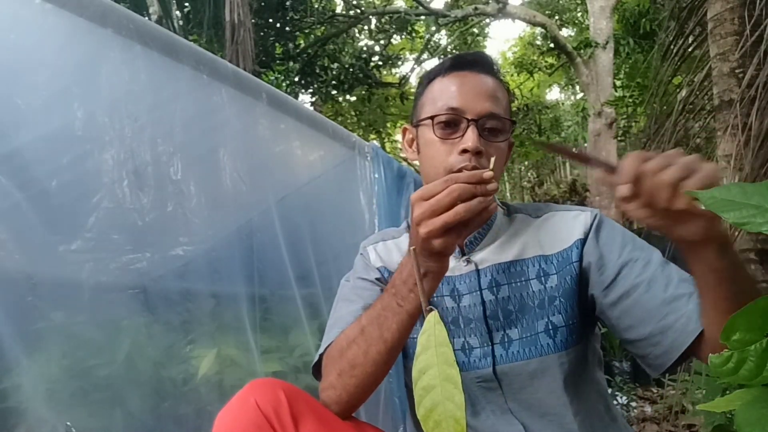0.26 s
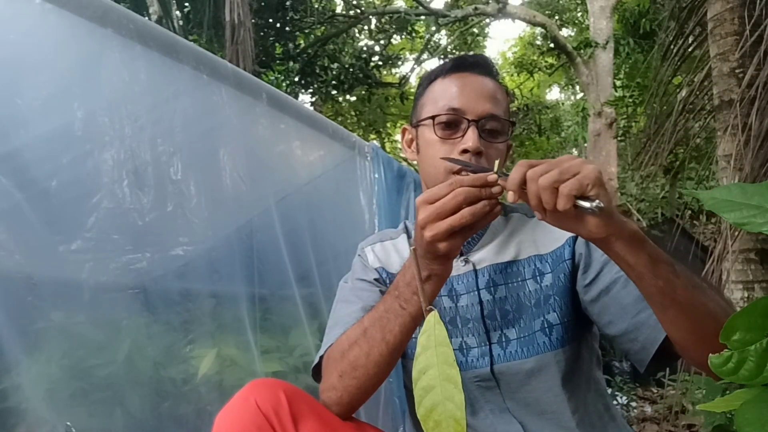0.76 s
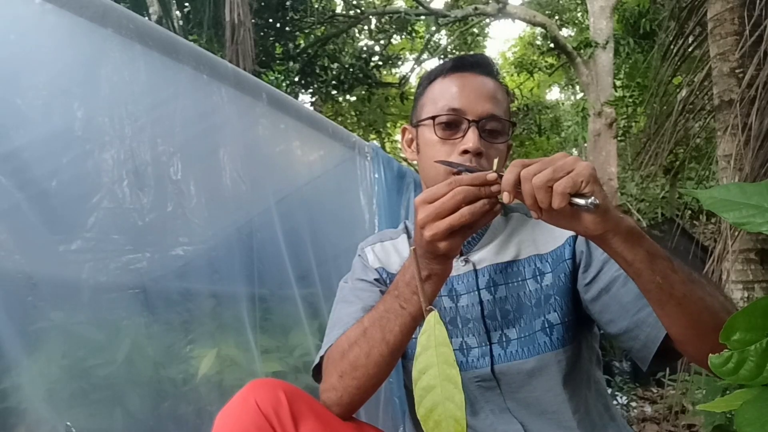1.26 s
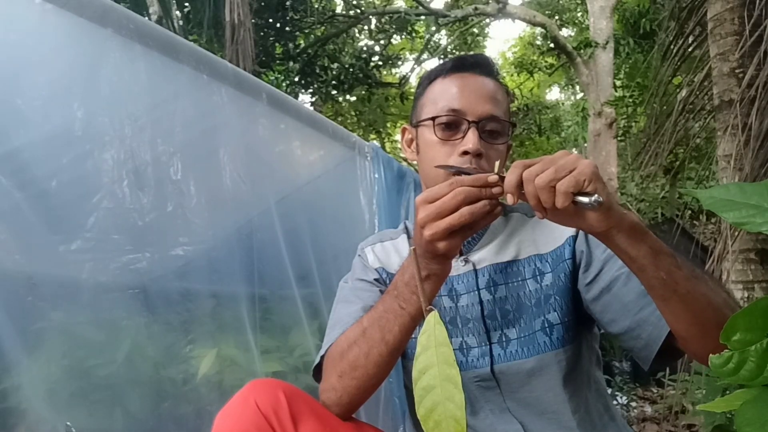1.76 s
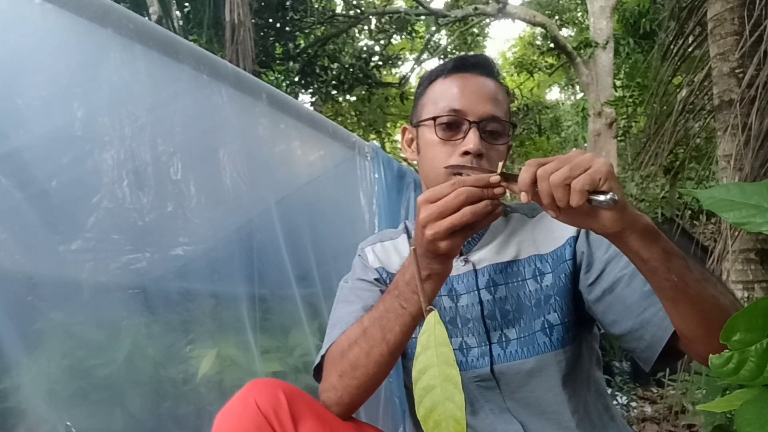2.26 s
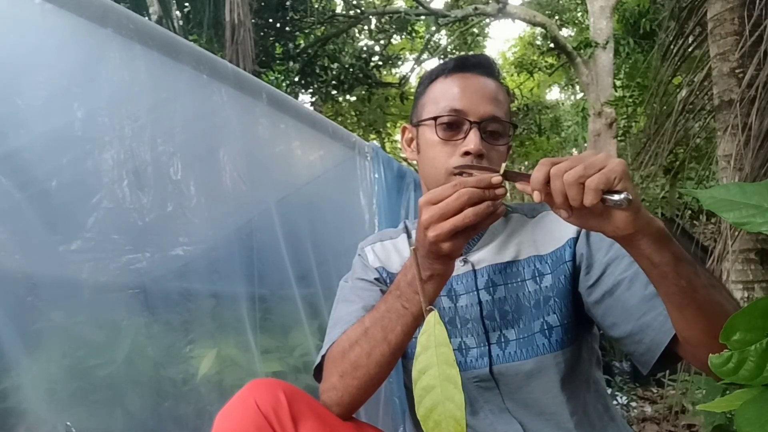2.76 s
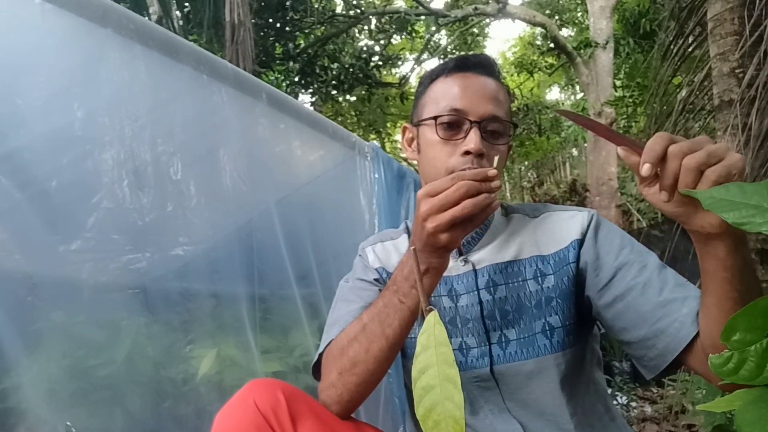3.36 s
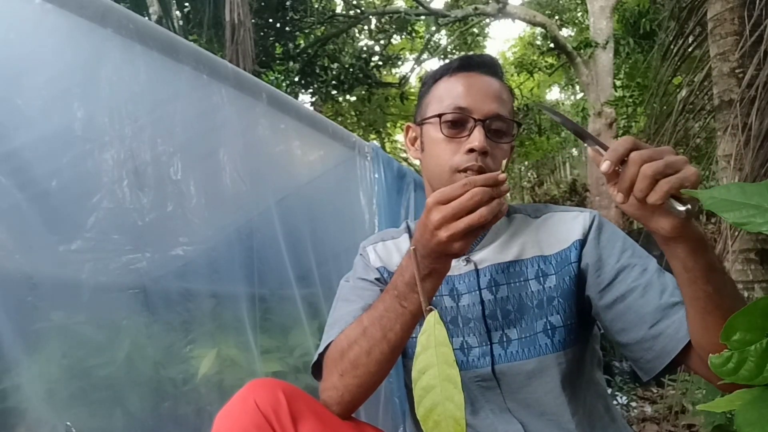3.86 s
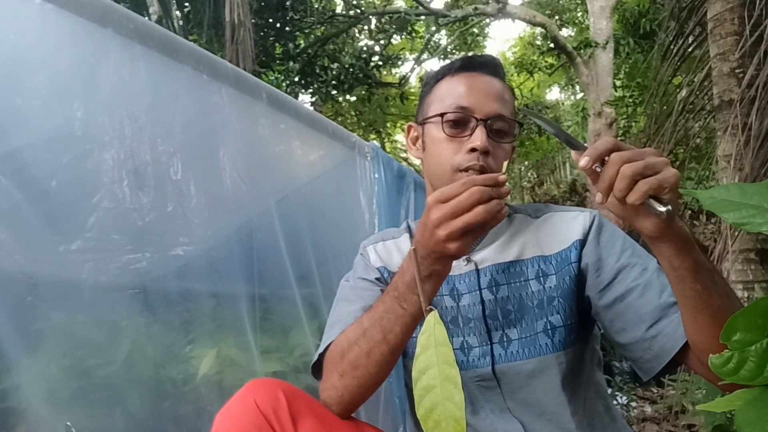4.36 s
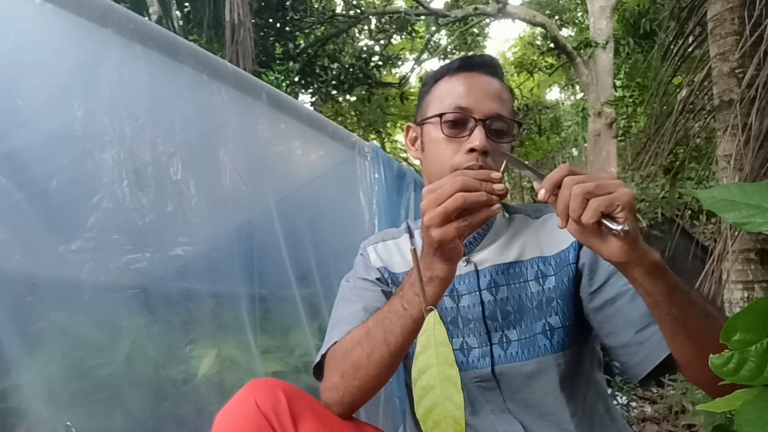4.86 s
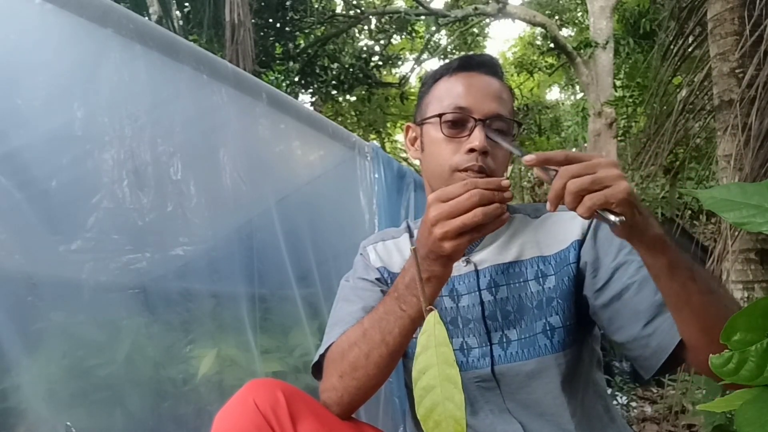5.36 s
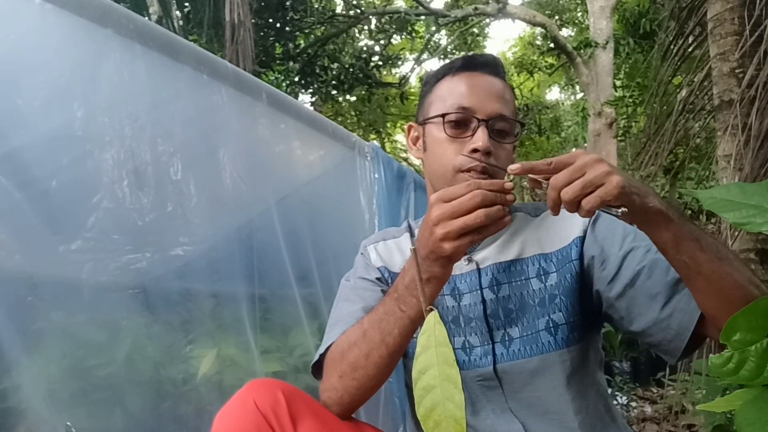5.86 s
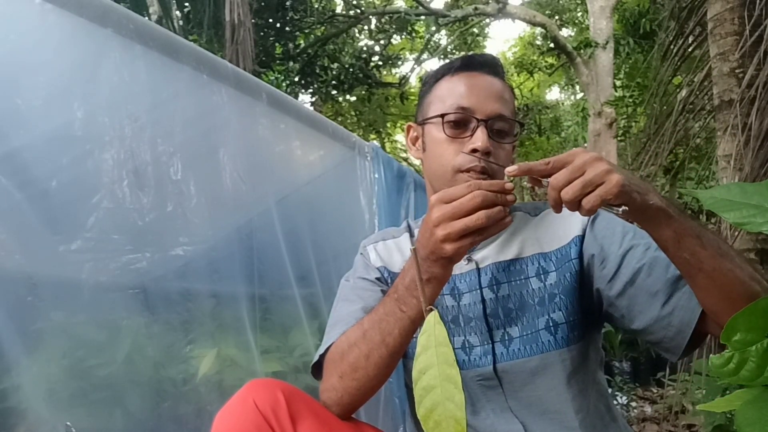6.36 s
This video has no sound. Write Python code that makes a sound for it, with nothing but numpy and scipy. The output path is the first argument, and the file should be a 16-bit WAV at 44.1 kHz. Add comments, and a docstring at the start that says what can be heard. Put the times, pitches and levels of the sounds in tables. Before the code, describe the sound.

Outdoors among trees, heard by a phone microphone. At 0 s a loud, clipped chick call falls away; a hollow woody knock lands at 0.2 s, with a far weaker, thinner tap at 0.34 s. A distant bird coos in low two-step whistles from 0.4 s, quick then slowing, and again from 5.7 s. Near chicks peep around 0.9, 1.6, 2.5 (drawn-out), 2.9, 4.0, 5.3, 5.7 and 6.4 s: soft held notes near 5 kHz plunging to about 2.3 kHz, with trunk echoes. A harsh chirp overlaps the 0.9 s peep. Crickets drone throughout near 4.5 kHz; a higher insect pulses in bursts, notably 2.5-3.1 and 5.5-6.2 s, and a pure trill flickers at 2.7 s. Leaves brush briefly at 3.1, 3.7 and 4.7 s. Faint farther chicks, low rumble, leaf hiss and dim dull swells after 4.3 s fill the background.

```python
"""Chicks peep among trees a few metres from a phone: gliding sines hold, then fall steeply through trunk echoes.
Crickets drone as pulsing narrow-band noise, a higher insect comes in humps of noise and another trills in sines.
Farther birds are whistles deep in echo, and a hollow object knocked twice is a sum of decaying modes.
Shaped noise makes the low rumble, leaf hiss, air hiss, brushing leaves and faint far swells."""
import sys
import numpy as np
from scipy import signal
from scipy.fft import rfft, irfft, next_fast_len
from scipy.io import wavfile
from scipy.ndimage import uniform_filter1d, map_coordinates

SR = 44100
rng = np.random.default_rng(int(sys.argv[2]) if len(sys.argv) > 2 else 0)


def wav_record(signal):
    """Record a signal, one row per channel, as 16-bit PCM in the file named by sys.argv[1]."""
    frames = np.transpose(np.atleast_2d(signal))
    bounded = np.clip(frames, -1, 1)
    # unit amplitude maps onto the largest positive 16-bit level
    quanta = np.round(bounded * 32767).astype(np.int16)
    wavfile.write(sys.argv[1], SR, quanta)


def invert_db(level):
    """Linear amplitude ratio for a level in decibels (20 dB per decade), elementwise."""
    return 10 ** (np.asarray(level, dtype=float) / 20)


N = 291060


def unit(x):
    """Scale to rms 1."""
    return x / np.sqrt(np.mean(x ** 2) + 1e-20)


def wobble(rate, count=N):
    """A smooth random curve through rate knots a second."""
    knots = rng.standard_normal(int(count * rate / SR) + 4)
    return map_coordinates(knots, [np.arange(count) * rate / SR])


def filtered(x, response):
    """Multiply the spectrum of x by a response of frequency."""
    m = next_fast_len(len(x) + 8192)
    return irfft(rfft(x, m) * response(np.fft.rfftfreq(m, 1 / SR)), m)[:len(x)]


def coloured(points):
    """Gain read from (frequency [Hz], gain [dB]) points on a log frequency axis."""
    f, db = np.transpose(points)
    return lambda hz: invert_db(np.interp(np.log(hz + 1), np.log(f + 1), db))


def resonant(modes):
    """Summed resonances (centre [Hz], half-width at half gain [Hz], gain [dB])."""
    return lambda f: sum(invert_db(db) / (1 + ((f - c) / w) ** 2) for c, w, db in modes)


def noise(response, patchy_db):
    """Coloured noise of rms 1 whose gain varies at random in patches of time and frequency."""
    z = signal.stft(rng.standard_normal(N), nperseg=512)[2]
    field = uniform_filter1d(rng.standard_normal(z.shape), 6, 0)
    field = uniform_filter1d(field, 12, 1)
    patchy = signal.istft(z * invert_db(patchy_db * unit(field)), nperseg=512)[1][:N]
    return unit(filtered(patchy, response))


def bumps(rows, sharp):
    """A gain curve with one hump a row: (middle [s], half-width to 1/e [s], level [dB])."""
    t = np.arange(N) / SR
    return sum(invert_db(db) * np.exp(-np.abs((t - s) / half_width) ** sharp) for s, half_width, db in rows)


def runs(rows, every, half_width):
    """Evenly spaced humps, about every seconds, from the first to the last time of each run."""
    humps = []
    for first, last, db in rows:
        count = 1 + max(round((last - first) / every), 0)
        humps += [(s, half_width, db) for s in np.linspace(first, last, count)]
    return humps


def add(out, s, x):
    """Mix x into out from time s."""
    part = out[max(round(s * SR), 0):][:len(x)]
    part += x[:len(part)]


def whistle(s, hz, db, hoarse, overtone_db, fade):
    """A gliding sine; hoarseness shakes level and pitch, effort brings out the octave."""
    t = np.arange(s[0], s[-1], 1 / SR)
    level_db = np.interp(t, s, db)
    hoarse = np.interp(t, s, np.clip(hoarse, 0, 1) + np.zeros(len(s)))
    pitch = np.interp(t, s, hz) * (1 + 0.0499 * hoarse * wobble(89.6, count=len(t)))
    phase = 2 * np.pi * (np.cumsum(pitch) / SR + rng.random())
    edge = np.clip(np.minimum(t - s[0], s[-1] - t) / fade, 0, 1)
    flutter = np.sqrt(1 - hoarse) + np.sqrt(hoarse) * wobble(253.7, count=len(t))
    effort = invert_db(0.83 * (level_db + 35.5))
    # the octave is strongest while the pitch passes 3200 Hz
    octave = invert_db(overtone_db) * effort * np.exp(-((pitch - 3200) / 450) ** 2)
    tone = np.sin(phase) + octave * np.sin(2 * phase)
    return np.sqrt(2) * invert_db(level_db) * edge * flutter * tone


def echoed(x, near_db, near_t60, far_db, far_t60):
    """Direct sound, one wall 22 ms behind it, dense close echoes and a longer tail among the trunks."""
    t = np.arange(SR // 2) / SR
    path = np.zeros(len(t))
    for db, t60 in ((near_db, near_t60), (far_db, far_t60)):
        tail = invert_db(-60 * t / t60) * rng.standard_normal(len(t)) * (t > .003)
        path += invert_db(db) * tail / np.linalg.norm(tail)
    rough_wall = rng.standard_normal(len(t)) * np.exp(-((t - .022) / 0.0088) ** 2)
    path += invert_db(-17.5) * rough_wall / np.linalg.norm(rough_wall)
    # foliage swallows the treble of the echoes
    path = filtered(path, coloured([(1000, 2), (3000, 3.5), (4500, 0.5), (5200, -3.5), (8000, -14.5)]))
    path[0] += 1  # direct sound
    return signal.fftconvolve(x, path)


def falling_peeps():
    """Times, pitches and levels of near peeps: a soft held note, a plunge to a knee, a slide to the bottom."""
    # near peeps: (plunge start [s], plunge length [s], slide length [s], plunge level [dB], slide level [dB])
    peep_rows = [(0.909, .044, 0.047, -30.5, -40.5), (1.587, .043, 0.045, -38.5, -42.5),
                 (2.907, 0.05, 0.042, -28.5, -35), (4.041, 0.036, 0.058, -36.5, -41),
                 (5.275, .039, .077, -36.5, -44), (5.715, 0.033, 0.043, -33, -37)]
    # held notes: (start [s], first pitch [Hz], pitch as the plunge starts [Hz], level as the note ends [dB])
    lead_rows = [(.8, 5050, 4850, -50), (1.47, 5140, 5010, -51), (2.86, 4820, 4860, -42),
                 (3.93, 4970, 4890, -45.5), (5.16, 5240, 4890, -48), (5.595, 5360, 5170, -50)]
    # plunge: (share of its length [0-1], share of the way to the knee [0-1], level re plunge level [dB])
    plunge_shape = [(0, 0, -15), (.33, .12, -1.5), (0.649, .5, 1)]
    # slide: (share of its length [0-1], pitch [Hz], level re slide level [dB])
    slide_shape = [(.35, 3254, -4), (.58, 3000, -1.5), (.8, 2680, -0.5), (.96, 2390, -8), (1, 2300, -16)]
    knee_hz, knee_above_mean_db, lead_swell_db = 3770, 1.5, 4
    down, drop, down_db = np.transpose(plunge_shape)
    on, on_hz, on_db = np.transpose(slide_shape)
    for peep, lead in zip(peep_rows, lead_rows):
        s, plunge, slide, plunge_db, slide_db = peep
        start, first_hz, top_hz, lead_db = lead
        knee_db = (plunge_db + slide_db) / 2 + knee_above_mean_db
        times = np.r_[start, s - .02, s + down * plunge, s + plunge, s + plunge + on * slide]
        # 20 ms before the plunge the pitch stands slightly higher
        hz = np.r_[first_hz, top_hz * 1.008, top_hz - drop * (top_hz - knee_hz), knee_hz, on_hz]
        plunging_db = np.maximum(plunge_db + down_db, lead_db)
        yield times, hz, np.r_[lead_db - lead_swell_db, lead_db, plunging_db, knee_db, slide_db + on_db]


def calls():
    """Time, pitch and level curves of every near call."""
    yield from falling_peeps()
    # a drawn-out peep: (share of length [0-1], pitch [Hz], level re the call [dB])
    drawl_shape = [(0, 4740, -9), (0.148, 4700, -9), (0.288, 4400, -0.5), (.44, 4080, 0), (.6, 3970, 1),
                   (0.759, 3700, -0.5), (.85, 3280, -6), (.91, 2660, 4), (1, 2420, -27)]
    # drawn-out peeps: (start [s], length [s], level [dB], level change over the call [dB])
    drawl_rows = [(2.5, .275, -37.5, -2.5), (6.386, .19, -50.5, 8.5)]
    share, hz, shape_db = np.transpose(drawl_shape)
    for s, length, db, swell_db in drawl_rows:
        yield s + share * length, hz, db + shape_db + swell_db * share
    # a loud held call and a soft one in two steps, each of rows (time [s], pitch [Hz], level [dB])
    odd_calls = [
        [(0, 4550, -19), (0.035, 4560, -22), (0.047, 4470, -29), (0.058, 3800, -31), (0.07, 3210, -43.5),
         (0.085, 2950, -52)],
        [(0.15, 4240, -35), (0.165, 3920, -45), (.2, 4006, -45), (0.24, 3915, -42.5), (.27, 4170, -48),
         (0.287, 4090, -54), (0.3, 3800, -51), (0.33, 3600, -40), (0.35, 3580, -66), (0.4, 3670, -60)],
    ]
    yield from map(np.transpose, odd_calls)


def chicks():
    """Each peep starts clear, cracks as the pitch falls, and meets its own echoes."""
    out = np.zeros(N)
    for s, hz, db in calls():
        hoarse = .04 + 0.33 / (1 + (hz / 3600) ** 10)
        peep = whistle(s, hz, db, hoarse, overtone_db=-5.5, fade=.003)
        add(out, s[0], echoed(peep, near_db=-7.5, near_t60=0.14, far_db=-7.0, far_t60=0.37))
    return out


def crickets():
    """A steady narrow band of noise, pulsed by wing strokes and by slower groups of them."""
    # drone: (time [s], level [dB])
    drone_levels = [(0.0, -40), (0.13, -42), (0.57, -50.5), (0.79, -49.5), (1.05, -46), (2.17, -47),
                    (2.81, -45.5), (3.18, -50), (4.1, -44), (5.0, -46.5), (5.48, -50), (5.86, -45),
                    (6.6, -45.5)]
    # cricket bodies: (resonance [Hz], half-width [Hz], relative level [dB])
    cricket_bodies = [(4523, 26, 2.5), (4400, 150, -4.5), (4640, 49, -0.5)]
    stroke_hz = 79.0 + 1.3 * wobble(2.2)
    group_hz = 21 + 0.47 * wobble(2.87)
    strokes = 1 + 0.16 * np.sin(2 * np.pi * np.cumsum(stroke_hz) / SR)
    groups = 1 + 0.15 * np.sin(2 * np.pi * np.cumsum(group_hz) / SR)
    drone = unit(strokes * groups * noise(resonant(cricket_bodies), patchy_db=0.96))
    return invert_db(np.interp(np.arange(N) / SR, *np.transpose(drone_levels))) * drone


def rumble():
    """Low noise whose level drifts very slightly."""
    # rumble spectrum: (frequency [Hz], relative level [dB])
    rumble_spectrum = [(15, -75), (25, -30), (53, -10), (79, -0.5), (112, 3.5), (317, -11.5), (430, -15.5),
                       (600, -22.5), (780, -33), (1320, -120)]
    return invert_db(-46 + 0.16 * wobble(3.7)) * noise(coloured(rumble_spectrum), patchy_db=0.88)


def leaf_hiss():
    """Leaves hiss as broad noise that follows the breeze."""
    # leaf hiss in the breeze: (time [s], level [dB])
    breeze_levels = [(0, -47.5), (1.5, -49), (3.5, -48.5), (4.8, -49), (6, -47.5), (6.6, -47)]
    # leaf spectrum: (frequency [Hz], relative level [dB])
    leaf_spectrum = [(180, -40), (300, -4.5), (500, -10.5), (920, -9), (1400, -14.5), (1800, -15.5),
                     (2300, -18), (3030, -14), (4000, -14), (4550, -17), (4950, -9.5), (5600, -12),
                     (6200, -6.5), (6830, -12.5), (7600, -6.5), (7850, -22), (9000, -50)]
    leaf_db = np.interp(np.arange(N) / SR, *np.transpose(breeze_levels))
    return invert_db(leaf_db) * noise(coloured(leaf_spectrum), patchy_db=1.82)


def air_hiss():
    """Faint treble noise whose level drifts by about a decibel."""
    # air spectrum: (frequency [Hz], relative level [dB])
    air_spectrum = [(7700, -32), (7900, -5.5), (8450, 4), (8650, -8.5), (9950, 0.5), (10800, -12),
                    (11500, -24), (11600, -4), (12900, -9), (13000, 2), (14200, -6), (14600, 4.5),
                    (15500, -2.5)]
    return invert_db(-57 + 0.94 * wobble(3.72)) * noise(coloured(air_spectrum), patchy_db=0.6)


def high_insect():
    """A higher insect swells in runs of bursts, humps of resonant noise."""
    # runs of bursts: (first burst [s], last burst [s], level [dB])
    burst_runs = [(.08, .44, -48.5), (1.0, 1.0, -57), (1.5, 1.5, -55), (2.12, 2.12, -51.5),
                  (2.46, 3.14, -46.5), (3.68, 4.02, -54), (5.52, 6.21, -48.5)]
    # insect body: (resonance [Hz], half-width [Hz], relative level [dB])
    high_bodies = [(7570, 150, 4), (7200, 200, -7), (7980, 150, -4.5), (14400, 600, -13.5)]
    bursts = runs(burst_runs, every=.345, half_width=.13)
    return bumps(bursts, sharp=2.45) * noise(resonant(high_bodies), patchy_db=0.5)


def knocks():
    """Each blow rings the hollow modes; a glancing blow wakes the upper ones more."""
    # knocks: (time [s], blow level [dB], tilt to the upper modes about 800 Hz [dB per octave])
    knock_rows = [(0.2027, -20.5, 1.5), (0.3367, -39.5, 7)]
    # modes of the hollow object: (frequency [Hz], relative level [dB], decay by 60 dB [s])
    hollow_modes = [(365, -27, .05), (454, -8.5, 0.086), (474.5, -0.5, 0.073), (423, -19, 0.044),
                    (600, -30, 0.034), (812, -2.5, 0.034), (866, -0.5, 0.029), (1237, -11.5, 0.069),
                    (1480, -12, 0.04), (1730, -6.5, 0.029), (2480, -18.5, 0.033), (2950, -14, 0.019)]
    out, t = np.zeros(N), np.arange(SR // 4) / SR
    for s, db, thin_db in knock_rows:
        ring = np.zeros(len(t))
        for hz, mode_db, t60 in hollow_modes:
            start_db = mode_db + thin_db * np.log2(hz / 800) + rng.normal(0, 1)
            ring += invert_db(start_db - 60 * t / t60) * np.sin(2 * np.pi * hz * t)
        soft = 1 - np.exp(-t / 0.00053)  # soft onset of the blow
        add(out, s, echoed(invert_db(db) * soft * ring, near_db=-6.5, near_t60=0.051, far_db=-17.5, far_t60=0.44))
    return out


def far_birds():
    """Distance blurs the notes of farther chicks and other birds: more echo than direct sound."""
    # farther chicks: (start [s], length [s], first pitch [Hz], level [dB])
    chick_notes = [(0.217, 0.095, 2947, -55.5), (0.477, 0.06, 3240, -57), (1.197, 0.12, 3260, -61),
                   (1.476, 0.096, 3220, -63), (1.792, 0.049, 2950, -58), (2.223, 0.35, 3100, -62.5),
                   (2.618, 0.094, 2990, -52.5), (3.33, 0.06, 2650, -62), (3.889, 0.21, 2950, -53),
                   (4.442, 0.041, 2880, -58), (4.599, 0.14, 3150, -63), (5.588, 0.22, 3056, -58),
                   (6.028, 0.099, 3010, -56.5)]
    # other birds: (start [s], length [s], first pitch [Hz], last pitch [Hz], level [dB])
    other_notes = [(0.503, 0.42, 839, 817, -67), (0.892, 0.012, 4740, 6400, -44),
                   (0.896, 0.02, 6500, 6400, -41), (0.974, .13, 4450, 2790, -53.5),
                   (1.574, 0.067, 7030, 7050, -48), (1.634, 0.0247, 7060, 6200, -44)]
    sag_hz_per_s, chick_hoarse, other_hoarse = 900, 0.653, .18
    notes = [(s, length, hz, hz - sag_hz_per_s * length, db, chick_hoarse) for s, length, hz, db in chick_notes]
    notes += [(*row, other_hoarse) for row in other_notes]
    out = np.zeros(N)
    for s, length, first_hz, last_hz, db, hoarse in notes:
        note = whistle([0, length], [first_hz, last_hz], [db, db], hoarse, overtone_db=-32, fade=0.094 * length)
        add(out, s, echoed(note, near_db=-4.0, near_t60=0.17, far_db=-1.5, far_t60=0.61))
    return out


def coos():
    """A distant bird's phrases of two-step whistled coos, quick at first, then slower."""
    # phrases: (start [s], stretch of time [ratio], level [dB])
    phrase_rows = [(.41, .99, -41.5), (5.686, 1.02, -42)]
    # coos of a phrase: (time into it before the stretch [s], low note re phrase level [dB])
    phrase_steps = [(0, 0), (.075, -19), (.146, -5), (.228, -7), (.322, -8), (.435, -8), (.612, -14),
                    (.795, -13.5)]
    # one coo: (share of length [0-1], pitch [Hz], blend from low to high note level [0-1])
    coo_shape = [(0, 985, 0.7), (.22, 994, 0), (.28, 1191, 1), (0.653, 1240, 1), (1, 1163, 1)]
    coo_s, high_note_db = 0.0771, -13  # the high note's level is relative to the phrase
    share, hz, high = np.transpose(coo_shape)
    out = np.zeros(N)
    for start, pace, db in phrase_rows:
        for s, low_db in phrase_steps:
            coo_db = db + low_db + high * (high_note_db - low_db)
            coo = whistle(share * coo_s, hz, coo_db, 0.21, overtone_db=-30, fade=0.0038)
            add(out, start + s * pace, echoed(coo, near_db=-10.0, near_t60=0.11, far_db=-6, far_t60=1.0))
    return out


def harsh_chirp():
    """A harsh chirp over one peep, two humps of resonant noise."""
    # chirp: (middle [s], half-width [s], level [dB])
    harsh_humps = [(.905, 0.013, -53), (.94, 0.055, -40)]
    rasp = noise(resonant([(6400, 200, -2), (5350, 1200, -2)]), patchy_db=3.5)
    return bumps(harsh_humps, sharp=4.8) * rasp


def trill():
    """A near insect's short pure wing strokes near 7.2 kHz. At the same moments a faint thin tone, 15 dB
    weaker, sounds at 14.8 kHz."""
    # wing strokes: (start [s], level [dB])
    trill_strokes = [(2.68, -37.5), (2.704, -37.5), (2.726, -41.5), (2.765, -47), (2.8, -48)]
    stroke_s = 0.031
    out = np.zeros(N)
    for s, db in trill_strokes:
        for hz, tone_db in ((7220, 0), (14818, -15)):
            stroke = whistle([0, stroke_s], [hz, hz], [db + tone_db] * 2, 0.036, overtone_db=-90, fade=0.0065)
            add(out, s, echoed(stroke, near_db=-3, near_t60=.05, far_db=-13, far_t60=.3))
    return out


def brushing_leaves():
    """Leaves brush briefly, short humps of crisp noise."""
    # rustles: (middle [s], half-width [s], level [dB])
    rustle_humps = [(3.7, 0.0025, -45), (3.133, 0.0044, -43), (3.125, .022, -45.5), (4.66, 0.077, -44)]
    crisp = coloured([(300, 12), (1500, 2), (6500, 4.5), (8300, -4), (8700, -18), (11000, -26),
                      (12000, -6), (15000, -9)])
    return bumps(rustle_humps, sharp=1.6) * noise(crisp, patchy_db=1.5)


def far_swells():
    """Faint dull swells far off, humps of low resonant noise."""
    # runs of swells: (first swell [s], last swell [s], level [dB])
    swell_runs = [(4.33, 4.33, -57), (4.82, 6.12, -55)]
    swells = runs(swell_runs, every=.26, half_width=.07)
    dull = noise(resonant([(1340, 260, 0.084), (1700, 130, -1.1)]), patchy_db=1)
    return bumps(swells, sharp=0.69) * dull


def scene():
    """One microphone feeds both channels."""
    animals = chicks() + crickets() + high_insect() + far_birds() + coos() + harsh_chirp() + trill()
    place = rumble() + leaf_hiss() + air_hiss() + knocks() + brushing_leaves() + far_swells()
    return np.tile(animals + place, (2, 1))


def top_cut(x):
    """Nothing passes above the cut-off."""
    return signal.sosfilt(signal.butter(12, 16720, fs=SR, output="sos"), x)


def record(dry):
    """The phone weakens the deepest bass and cuts the treble from 15.5 kHz up."""
    def band(hz):
        bass_cut = 0.13 + 1 / np.sqrt(1 + (60 / (hz + 1)) ** 8)
        return (hz < 15500) * bass_cut
    mix = np.array([filtered(side, band) for side in dry])
    return top_cut(mix)


dry = scene()
out = record(dry)
wav_record(out)
```